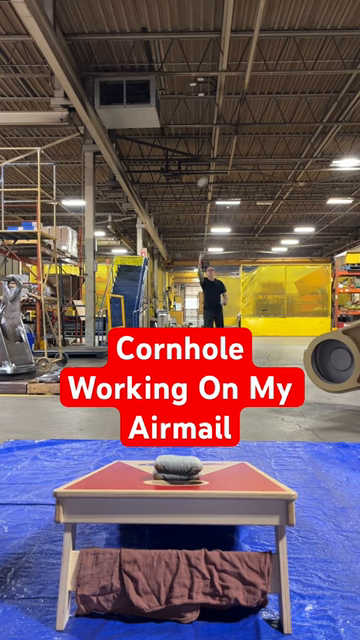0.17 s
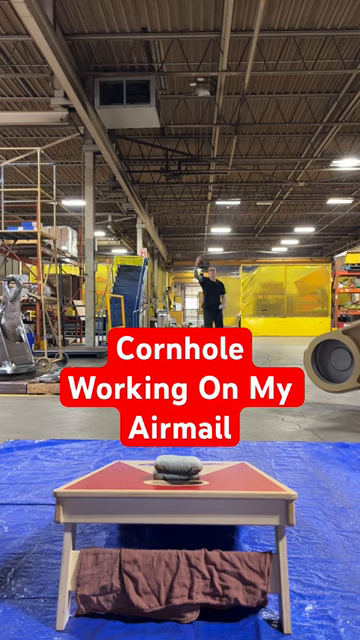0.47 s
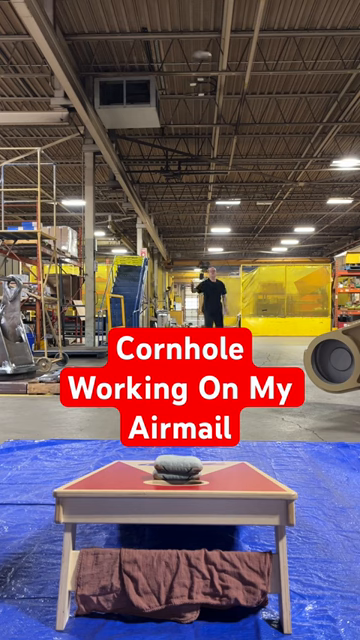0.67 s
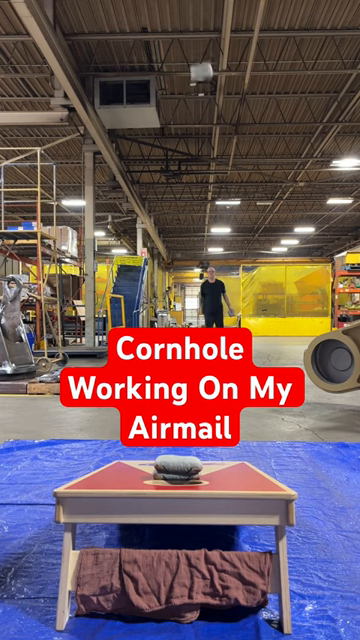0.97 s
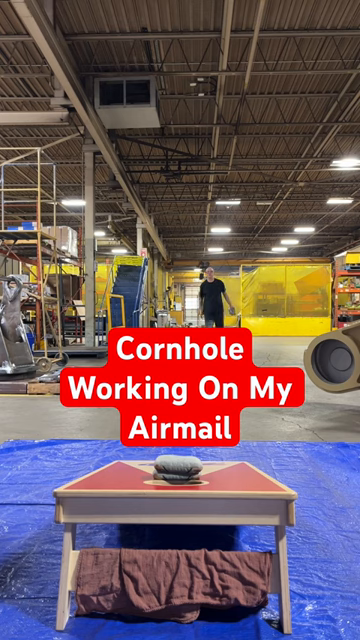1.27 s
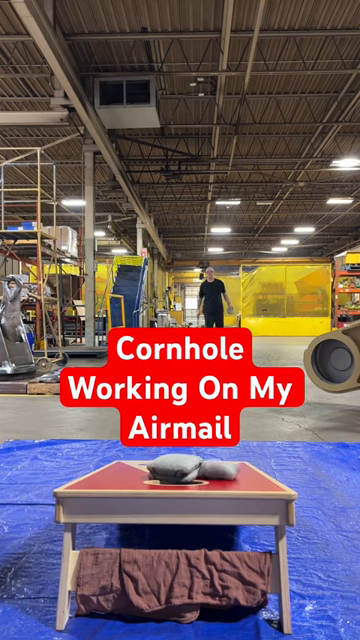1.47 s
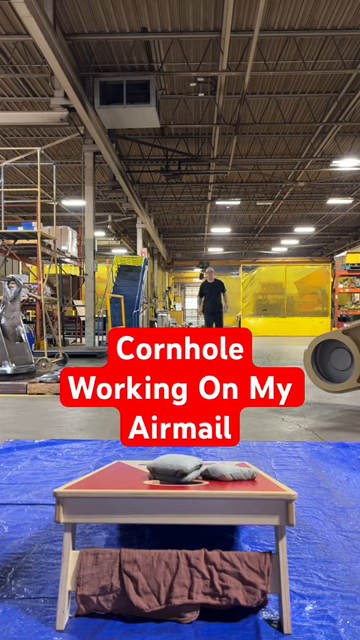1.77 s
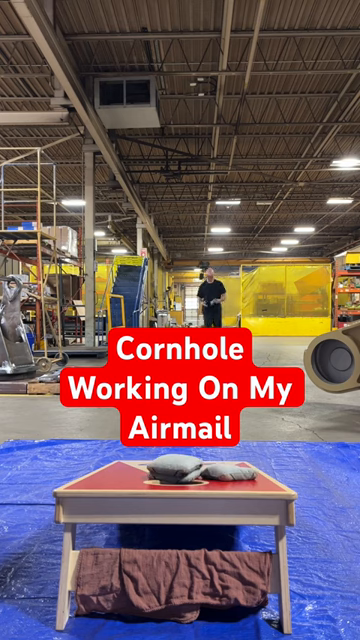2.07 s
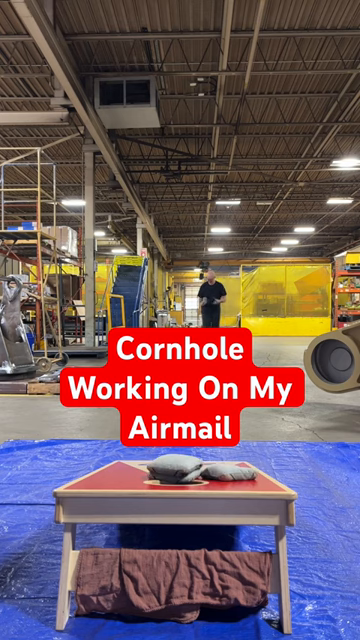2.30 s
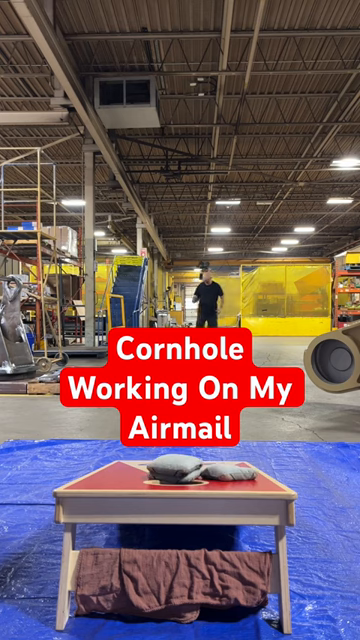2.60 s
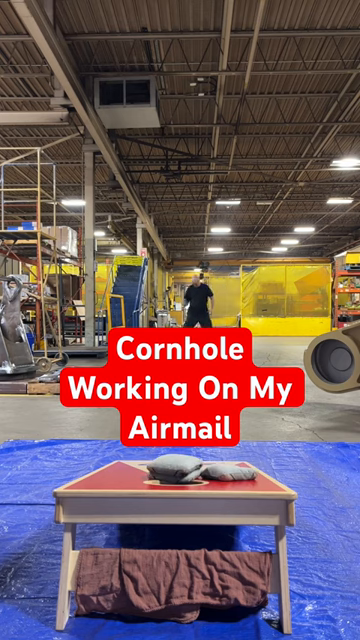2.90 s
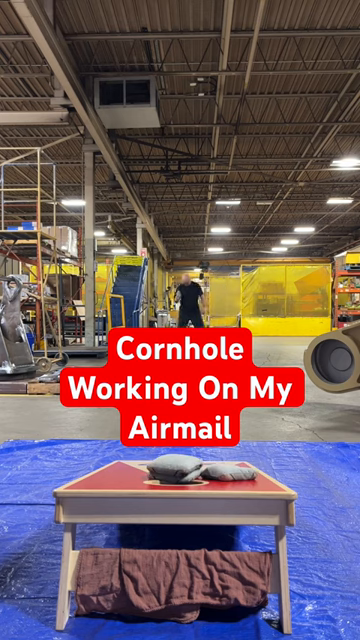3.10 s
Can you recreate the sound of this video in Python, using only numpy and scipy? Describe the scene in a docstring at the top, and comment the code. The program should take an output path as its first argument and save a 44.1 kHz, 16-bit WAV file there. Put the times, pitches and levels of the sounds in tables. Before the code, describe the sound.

A pellet-filled beanbag lands hard on a hollow wooden board close to the microphone, with a crunch, quick knocks and brief cloth slide, then a hall echo; loud ventilation rumbles throughout the large warehouse.

```python
"""A warehouse's ventilation rumbles and rushes throughout: coloured noise under narrow wandering fan lines.
At 1.32 s a beanbag lands on a hollow wooden board nearby: its pellets crunch as bursts of grainy noise,
and the board, a bank of damped modes, thuds, hops and knocks back down while the cloth slides to a stop.
The hall answers with decaying diffuse noise; the recorder's limiter ducks at the blow,
then lets the ventilation swell back."""
import sys
import numpy as np
from scipy import signal
from scipy.fft import rfft, irfft, next_fast_len
from scipy.io import wavfile
from scipy.ndimage import uniform_filter1d, minimum_filter1d, map_coordinates

SR = 44100
rng = np.random.default_rng(int(sys.argv[2]) if len(sys.argv) > 2 else 0)


def wrap_up_sound(samples):
    """Save the sound to the file named by the first command line argument, as 16-bit audio."""
    columns = np.atleast_2d(samples).T
    # keep every value between -1 and 1, then stretch to whole-number steps
    tamed = np.clip(columns, -1, 1)
    steps = np.round(tamed * 32767).astype(np.int16)
    wavfile.write(sys.argv[1], SR, steps)


N = 143325

# stereo width given to diffuse sound: hz, side_minus_mid_db
# (the swings at 8500 and 11500 Hz are coding traces, not the hall or air)
DIFFUSE_WIDTH = [(50, -38), (100, -29.5), (150, -10), (220, -9.5), (300, -8.5), (400, -3), (570, -3.5),
                 (750, 0.5), (1150, -1), (1500, 4.5), (1800, -5), (3300, -0.5), (6000, -11.5), (8500, 21.5),
                 (11500, -19.5)]
EARS = np.array([[0.5], [-0.5]])  # shares a left-minus-right difference between the channels


def amp(db):
    """Level: 20 dB is a factor of ten in amplitude."""
    return 10 ** (np.asarray(db) / 20)


def unit(x):
    """Normalisation: equal mean power, at rms 1."""
    return x / np.sqrt(np.mean(x ** 2) + 1e-20)


def along(points, hz):
    """Logarithmic frequency: (hz, value) points are joined by straight lines on a log axis."""
    f, v = np.transpose(points)
    return np.interp(np.log(hz + 1), np.log(f + 1), v)


def since(s):
    """Causality: seconds elapsed since s, zero before it."""
    return np.maximum(np.arange(N) / SR - s, 0)


def fade(t, t60):
    """Exponential decay: the level falls by 60 dB in t60 seconds."""
    return np.exp(-np.log(1000) * t / t60)


def wobble(rate):
    """Slow random modulation: a smooth curve through `rate` random knots a second."""
    knots = rng.standard_normal(N // 10)
    return map_coordinates(knots, [np.arange(N) * rate / SR + 2])


def filtered(x, response):
    """Linear filtering: the spectrum of x is multiplied by a response of frequency."""
    m = next_fast_len(N + SR // 2)
    hz = np.fft.rfftfreq(m, 1 / SR)
    return irfft(rfft(x, m) * response(hz), m)[..., :N]


def noise(spectrum):
    """Coloured noise: white noise shaped by a spectrum in dB, at rms 1."""
    white = rng.standard_normal(N)
    return unit(filtered(white, lambda hz: amp(along(spectrum, hz))))


def spread(pair, width):
    """Interaural correlation: two unrelated signals become mid and side, balanced at each frequency."""
    def mid_side_gains(hz):
        angle = np.arctan(amp(along(width, hz)))
        return np.array([np.cos(angle), np.sin(angle)])

    mid, side = filtered(pair, mid_side_gains)
    return np.array([mid + side, mid - side])


def ventilation():
    """Turbulent noise: air handlers give a throbbing central rumble under a wide, faintly patchy rush."""
    # colour of the air: hz, level_db per Hz
    air_spectrum = [(20, -11), (35, -25), (52, 3), (80, 1), (105, -2), (155, -7), (200, -12), (245, -17.5),
                    (310, -13), (345, -16), (385, -13.5), (450, -16), (570, -13), (700, -17.5), (1000, -18),
                    (1220, -21), (1550, -21), (1750, -26), (2150, -27), (3100, -31), (4900, -41.5),
                    (7000, -48), (10000, -56), (13500, -58.5), (15000, -103)]
    # direction of the air: hz, left_minus_right_db
    air_lean = [(200, -0.5), (1000, 2.5), (1450, -4.5), (1800, 4.5), (3000, 1), (4700, 9.5), (7000, 4.5)]
    level_db, rumble_hz = -22.5, 150
    throb_db, throb_per_s, patchy_db = 0.5, 12.03, 0.98

    # random level patches in time and frequency, smoothed over 6 bands and 14 frames
    z = signal.stft(rng.standard_normal((2, N)), nperseg=512)[2]
    patches = uniform_filter1d(rng.standard_normal(z.shape[1:]), size=6, axis=0)
    patches = uniform_filter1d(patches, size=14, axis=1)
    pair = signal.istft(z * amp(patchy_db * unit(patches)), nperseg=512)[1][:, :N]

    def colour(hz):
        return amp(along(air_spectrum, hz) + EARS * along(air_lean, hz))

    air = filtered(spread(pair, DIFFUSE_WIDTH), colour)
    rumble = filtered(air, lambda hz: 1 / (1 + (hz / rumble_hz) ** 4))
    throb = amp(throb_db * wobble(throb_per_s))
    return amp(level_db) * unit(air + rumble * (throb - 1))


def fans():
    """Narrow-band noise: a random complex envelope on a carrier makes each unsteady hum or whine."""
    # fan lines: pitch_hz, level_db, envelope_knots_per_s, left_minus_right_phase_rad
    fan_lines = [(78.7, -36.5, 5.38, 0), (592, -54, 12, -1.5), (1320, -42, 18, 3)]
    out = np.zeros((2, N))
    for hz, db, knots_per_s, phase in fan_lines:
        envelope = wobble(knots_per_s) + 1j * wobble(knots_per_s)
        line = envelope * np.exp(2j * np.pi * hz * since(0))
        out += amp(db) * unit(np.real(line * np.exp(1j * phase * EARS)))
    return out


def room(x, decay, delay_s):
    """Reverberation: convolution with diffuse noise in which each frequency dies at its own speed."""
    hz, t, z = signal.stft(rng.standard_normal((2, 3 * SR // 2)), SR, nperseg=256)
    tail = signal.istft(z * fade(t, along(decay, hz)[:, None]), SR, nperseg=256)[1]
    # divide by the root of the energy expected at the second point's decay time
    tail = tail / np.sqrt(decay[1][1] * SR / np.log(1e6))
    wet = signal.fftconvolve(x[None], tail, axes=1)[:, :N]
    delayed = filtered(wet, lambda hz: np.exp(-2j * np.pi * hz * delay_s))
    return spread(delayed, DIFFUSE_WIDTH)


def slide():
    """Sliding friction: the cloth scuffs in uneven grains, its level following speed down to a stop."""
    # colour of the cloth on the board: hz, level_db per Hz
    cloth_spectrum = [(400, -12), (1400, 3.5), (2500, -1.5), (4200, -7.5), (6500, -23), (12000, -56)]
    start_s, rise_s, length_s, level_db = 1.342, 0.0045, 0.22, -28
    scuffs_per_s, scuff_db = 300, 1.5

    t = since(start_s)
    speed = (1 - np.exp(-t / rise_s)) * np.maximum(1 - t / length_s, 0)
    unevenness = unit(amp(scuff_db * wobble(scuffs_per_s)))
    grains = unevenness * np.array([noise(cloth_spectrum), noise(cloth_spectrum)])
    return amp(level_db) * speed * grains


def bag():
    """Granular collisions: plastic pellets crunch while the bag flattens, then trickle to rest."""
    # flattening and jolts of the bag: start_s, level_db, low_pass_hz, length_s
    crunches = [(1.3163, -19.5, 16000, .005), (1.3218, -13, 13000, .003), (1.377, -16, 3200, .005),
                (1.4, -29, 2200, .004)]
    # colour of the pellets: hz, level_db per Hz
    pellet_spectrum = [(200, -5), (600, 13), (1250, 15.5), (1750, 7.5), (2200, 4.5), (3400, 3), (5200, -8),
                       (7000, 2), (9000, -15), (11000, 6), (13400, 3.5), (15000, -27)]
    # stereo width of the crunch: hz, side_minus_mid_db
    pellet_width = [(500, -14), (2000, -3.5), (6000, 1.5), (11000, -1.5)]
    rise_s, crunch_t60_s = 0.00073, 0.019
    settle_db, settle_t60_s = -27, 0.2  # the trickle, relative to the crunch
    grains_per_s, grain_db = 2100, 3.5

    out = np.zeros((2, N))
    for start_s, db, low_pass_hz, length_s in crunches:
        t, after = since(start_s), since(start_s + length_s)
        rise = 1 - np.exp(-t / rise_s)
        fall = fade(after, crunch_t60_s) + amp(settle_db) * fade(after, settle_t60_s)
        unevenness = unit(amp(grain_db * wobble(grains_per_s)))
        grains = unevenness * np.array([noise(pellet_spectrum), noise(pellet_spectrum)])
        dulled = filtered(grains, lambda hz: 1 / (1 + (hz / low_pass_hz) ** 6))
        out += amp(db) * rise * fall * dulled
    return spread(out, pellet_width)


def board():
    """Modal vibration: each blow rings the same modes; contact sets the range, the bag's weight damps."""
    # landing, hop and settling: start_s, gain_db, high_pass_hz, low_pass_hz, ring_time_factor
    blows = [(1.3217, -7.5, 165, 1130, 1.2), (1.3303, 4, 550, 684, .68), (1.3488, -10.5, 515, 957, .8),
             (1.3593, -10, 363, 455, 1.69), (1.3764, -1, 690, 970, 1.0), (1.3809, -5.5, 170, 905, .85),
             (1.394, -9.3, 274, 549, .67), (1.4043, -18, 682, 1069, 1.2), (1.4143, -11.5, 140, 215, .9)]
    # modes of the board: pitch_hz, relative_level_db, t60_s (before a blow's ring_time_factor)
    modes = [(230, -6.5, 0.047), (255, -11, 0.084), (297.3, 5, 0.042), (341.6, -6, 0.079),
             (402, -8.5, 0.052), (513, -2, 0.035), (584.5, -1.5, 0.033), (684, -8.5, 0.03),
             (800, -1.5, 0.041), (872, -7.5, 0.025), (990, -6.5, 0.03), (1260, -8.4, 0.035),
             (1640, -16, 0.038), (2170, -9, .035)]
    # colour of the frame's dull clatter: hz, level_db per Hz
    clatter_spectrum = [(60, -32), (160, 1), (300, -26), (470, -9), (600, 2.5), (1100, -6.5), (1600, -10),
                        (2500, -8), (5000, -27), (10000, -44)]
    ring_db, attack_s, mode_scatter_db = 5, 0.00069, 0.4
    clatter_db, clatter_t60_s = -4, 0.05

    out = np.zeros(N)
    for start_s, db, high_pass_hz, low_pass_hz, ring_factor in blows:
        t = since(start_s)
        ring = np.zeros(N)
        for hz, level_db, t60_s in modes:
            gain = amp(level_db + mode_scatter_db * rng.standard_normal())
            ring += gain * fade(t, t60_s * ring_factor) * np.sin(2 * np.pi * hz * t)
        clatter = amp(clatter_db) * noise(clatter_spectrum) * fade(t, clatter_t60_s)
        blow = (amp(ring_db) * ring + clatter) * (1 - np.exp(-t / attack_s))
        blow = signal.lfilter(*signal.butter(2, high_pass_hz, "highpass", fs=SR), blow)
        out += amp(db) * signal.lfilter(*signal.butter(2, low_pass_hz, fs=SR), blow)
    return out


def scene():
    """Superposition: direct sound, just right of centre by time and level, plus the room and the air."""
    # decay of the floor and nearby shelves: hz, t60_s
    near_decay = [(200, 0.13), (1000, 0.64), (10000, 0.06)]
    # decay of the hall: hz, t60_s
    hall_decay = [(150, 0.96), (700, 1.26), (2500, 3), (6000, 0.56), (12000, 0.13)]
    near_db, near_delay_s = -11, 0.008
    hall_db, hall_delay_s = -9, 0.025
    right_lead_s, board_lean_db = 0.00014, -1  # lean is left minus right

    wood, pellets = board(), bag()
    shifted = filtered(wood, lambda hz: np.exp(-2j * np.pi * hz * right_lead_s * EARS))
    direct = amp(board_lean_db * EARS) * shifted
    hit = wood + pellets.mean(axis=0)
    near = amp(near_db) * room(hit, near_decay, near_delay_s)
    hall = amp(hall_db) * room(hit, hall_decay, hall_delay_s)
    return direct + pellets + slide() + near + hall + ventilation() + fans()


def limiter(x):
    """Gain control: ducks just ahead of a peak, the bass more deeply, holds, then recovers steadily."""
    ceiling_db, lookahead_s, hold_s = -0.15, 0.0044, 0.17
    release_db_per_s = 42  # above the bass
    bass_hz, bass_duck = 140, 2.02  # the bass moves this many times as far in dB

    peak_db = 20 * np.log10(np.abs(x).max(axis=0) + 1e-9)
    need_db = np.minimum(ceiling_db - peak_db, 0)
    ahead, hold = max(int(lookahead_s * SR), 1), max(int(hold_s * SR), 1)
    held_db = minimum_filter1d(need_db, ahead)
    held_db = minimum_filter1d(held_db, hold, origin=(hold - 1) // 2)
    # a running minimum against a rising line limits the speed of recovery
    climb_db = release_db_per_s * since(0)
    gain_db = np.minimum.accumulate(held_db - climb_db) + climb_db
    gain_db = uniform_filter1d(gain_db, ahead)
    bass = filtered(x, lambda hz: 1 / (1 + (hz / bass_hz) ** 6))
    return (x - bass) * amp(gain_db) + bass * amp(bass_duck * gain_db)


def record(dry):
    """Recording chain: low cut, limiter, saturation that rounds the peaks, then a band limit."""
    low_cut_hz, top_hz, clip_level = 18, 14700, 0.97
    x = limiter(filtered(dry, lambda hz: 1 - 1 / (1 + (hz / low_cut_hz) ** 6)))
    rounded = x / (1 + np.abs(x / clip_level) ** 6) ** (1 / 6)
    return filtered(rounded, lambda hz: hz < top_hz)


dry = scene()
out = record(dry)
wrap_up_sound(out)
```